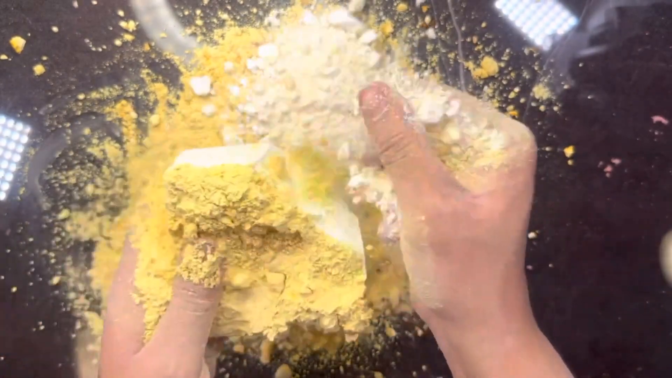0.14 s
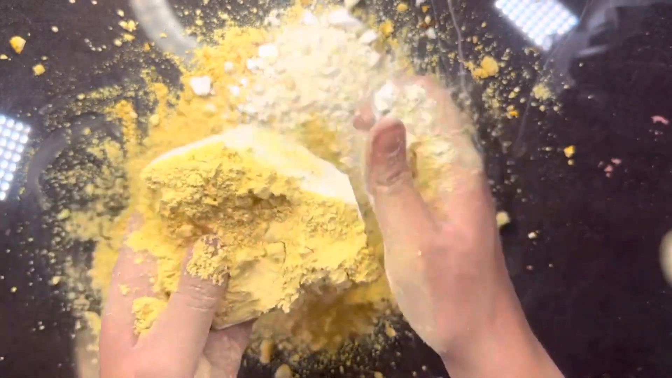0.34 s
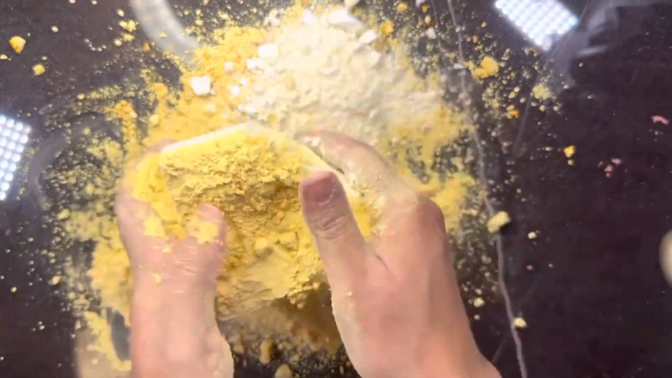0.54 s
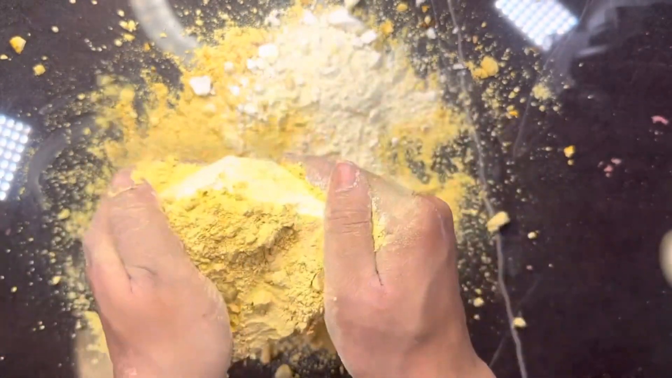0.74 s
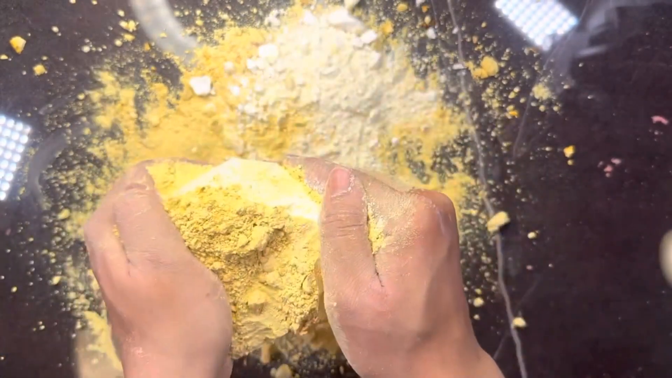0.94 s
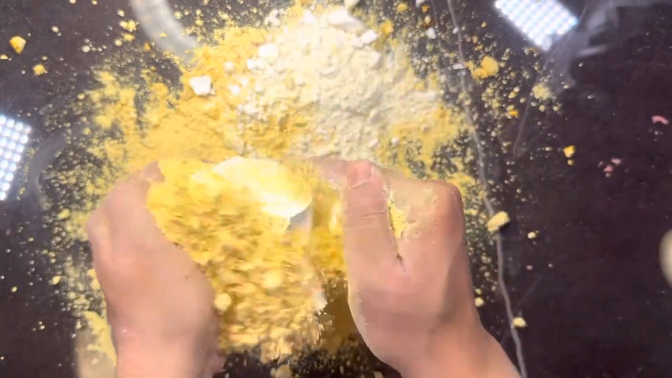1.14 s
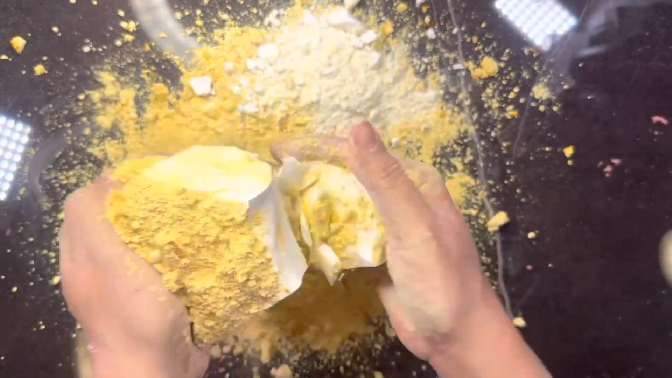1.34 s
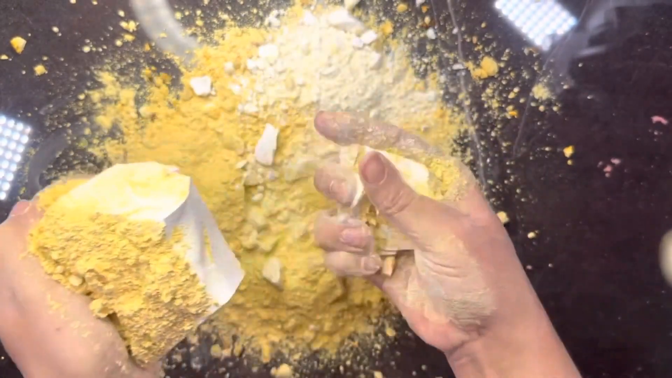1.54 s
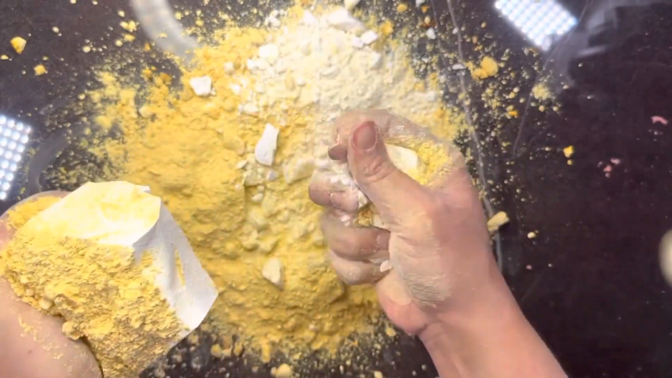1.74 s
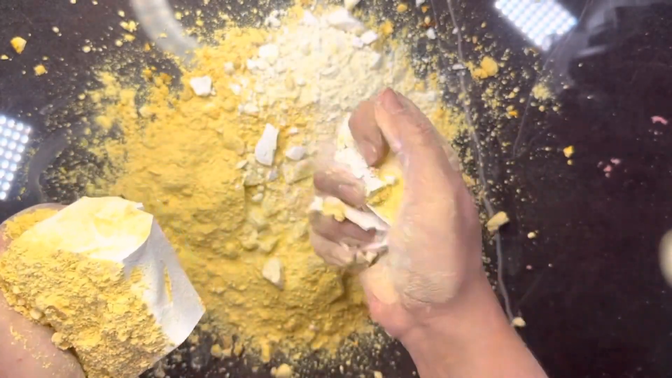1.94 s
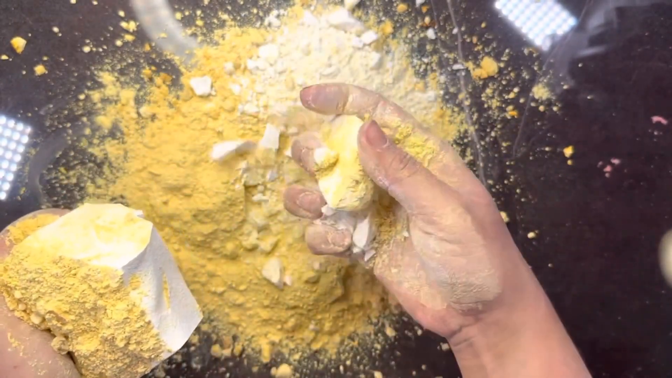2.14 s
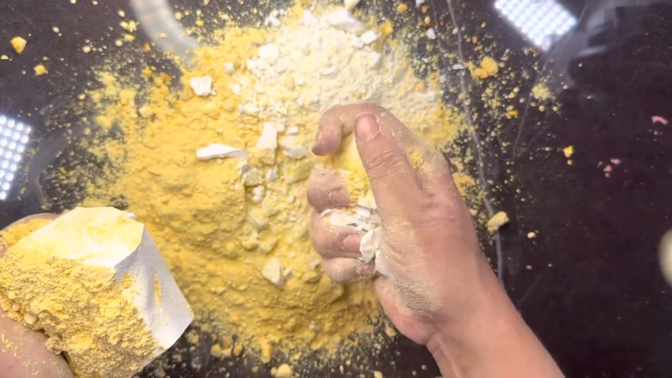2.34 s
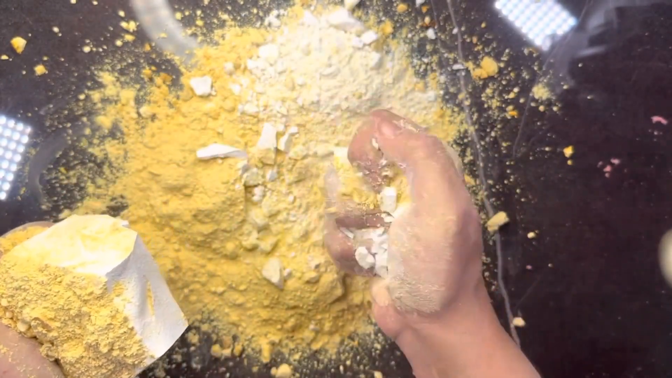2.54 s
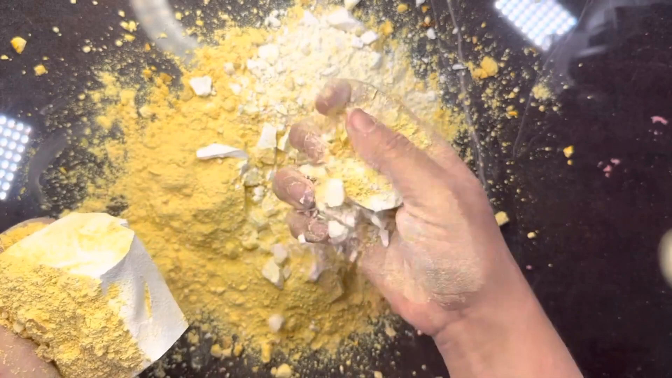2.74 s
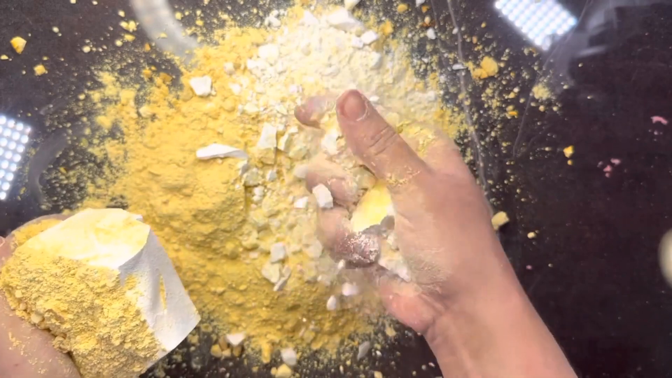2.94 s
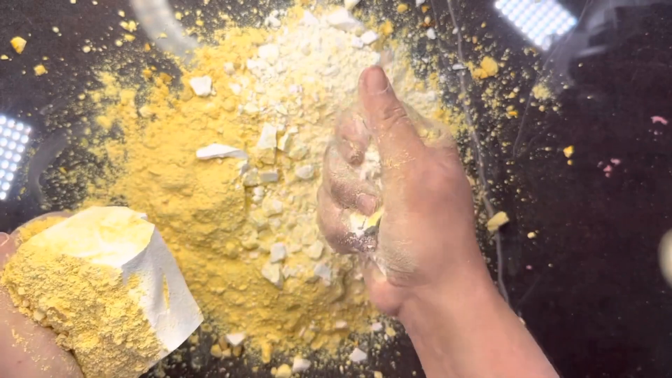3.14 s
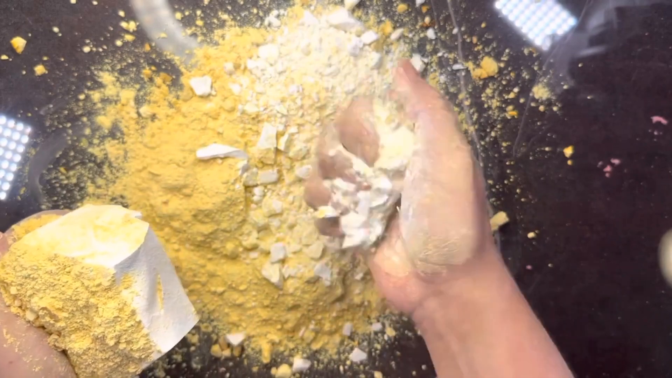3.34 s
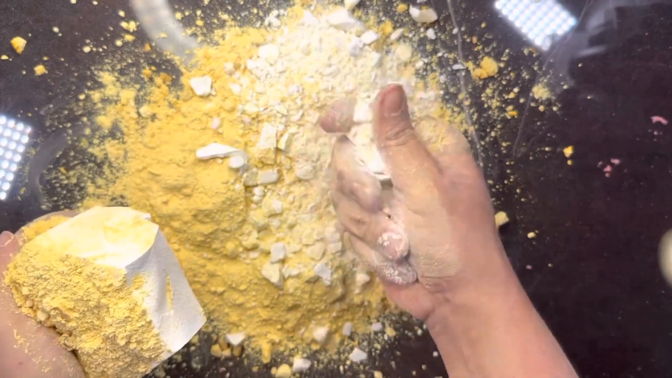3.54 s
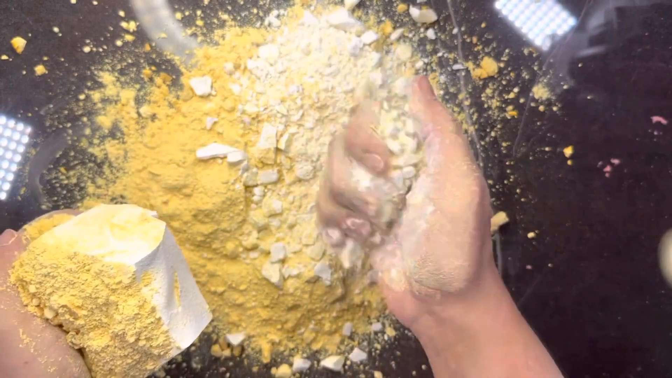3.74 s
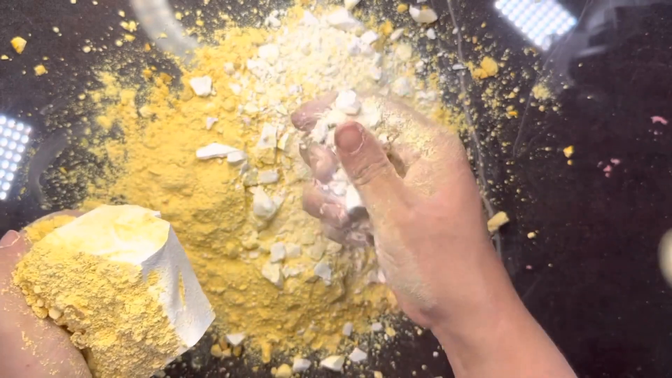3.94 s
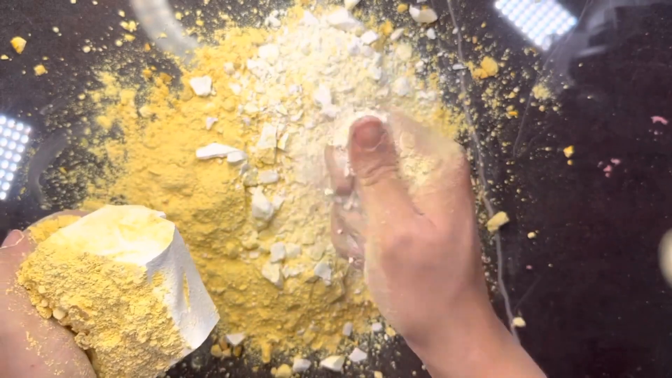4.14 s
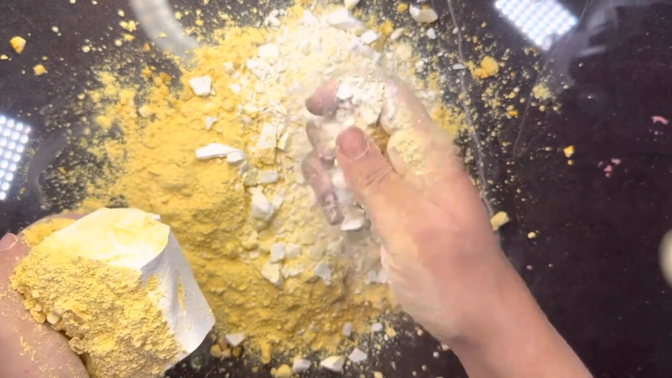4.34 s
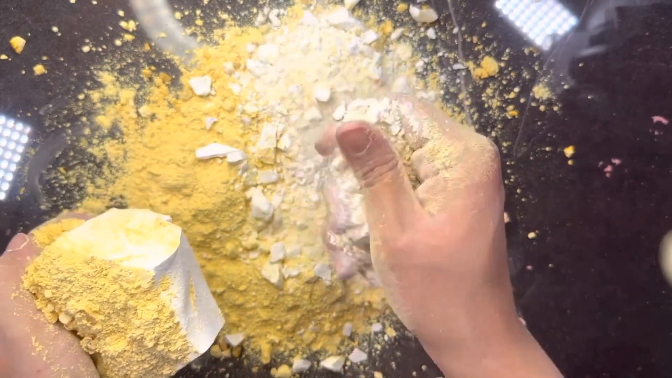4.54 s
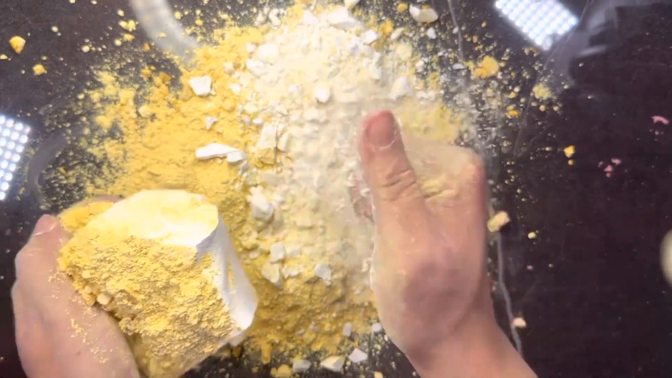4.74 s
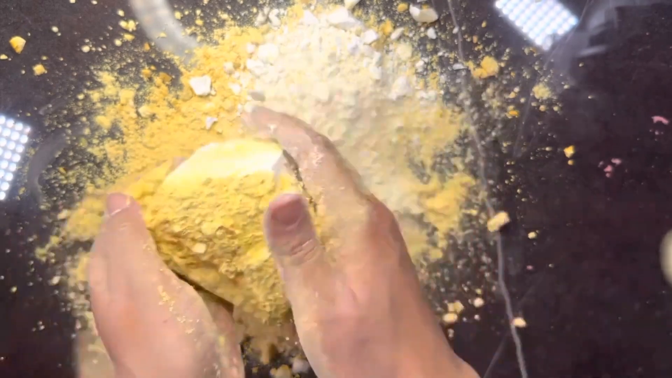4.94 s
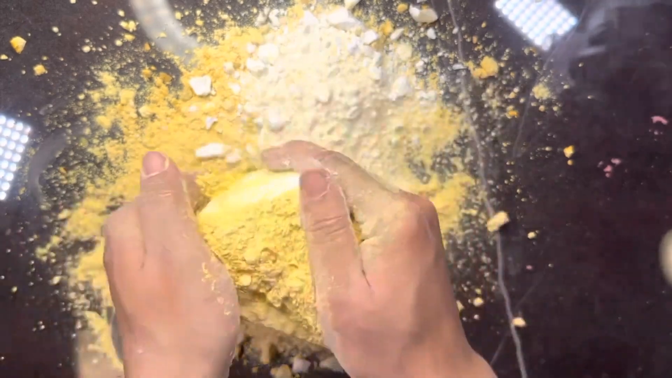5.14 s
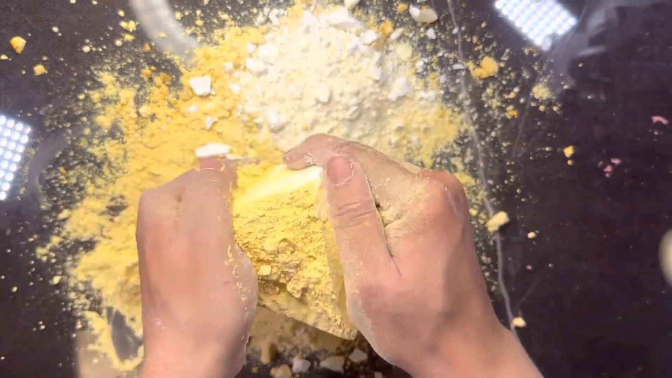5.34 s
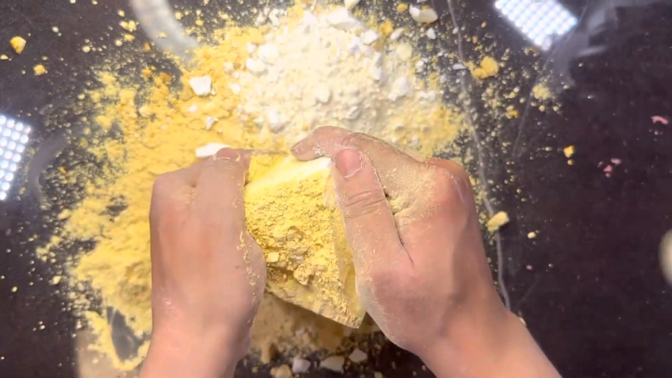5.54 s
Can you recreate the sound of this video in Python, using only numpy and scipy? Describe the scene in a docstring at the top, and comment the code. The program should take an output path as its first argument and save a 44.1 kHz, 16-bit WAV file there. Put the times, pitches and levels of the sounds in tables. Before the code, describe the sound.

Hands handle a block of chalk close to the microphone, in a small room with a faint low rumble. A sharp little crack comes right at the start, followed by soft crunching, a hiss of powder and a brief rasp of skin on chalk. At about 1.1 seconds the block breaks with a brittle snap and a dull thud. From 1.5 to 1.9 seconds a fist crushes the broken piece in a dense run of loud cracks. More squeezes follow around 2.5, 2.9, 3.2, 3.7 and 4 seconds, each with crackling, grinding crumbs, faintly clinking fragments and hissing powder, while lumps knock softly on the table. The crunching grows gentler, with a low bump near 4.9 seconds and a short brush through powder. After a quieter moment, the loudest snap splits the block with a heavy thud at about 5.7 seconds.

```python
"""A brittle snap over a fine crunch: two hands break a block of gym chalk above a table.
Then one fist crushes the broken piece, squeeze after squeeze. Each crack rings its fragment and sheds
debris, freed pieces clink, crumbs grind and powder hisses. The big breaks thud through block, hands and
table, and a last one splits the block again. Heard close up, in a small room with a low rumble."""
import sys
import numpy as np
from scipy import signal
from scipy.fft import rfft, irfft
from scipy.io import wavfile

SR = 44100
rng = np.random.default_rng(int(sys.argv[2]) if len(sys.argv) > 2 else 0)


def wav_out(sig):
    """Save sig, one row per channel (or a flat mono array), as 16-bit PCM at SR to the path in sys.argv[1]."""
    wavfile.write(sys.argv[1], SR, np.round(np.clip(np.atleast_2d(sig).T, -1, 1) * 32767).astype(np.int16))


N = 250929
TIME = np.arange(N) / SR
CUTOFF_HZ = 15550

# the featured cracks: t/s, level/dB, fragment ring f/Hz, brightness f/Hz
CRACKS = [(.1333, -16, 710, 1200), (.1491, -6.5, 7300, 6050), (0.4099, -25.5, 1890, 5300),
          (.544, -18.5, 940, 3200), (.6932, -26.5, 750, 1210), (.813, -29, 1290, 2200),
          (1.0724, -34, 2420, 2200), (1.1245, -7.5, 515, 14100), (1.1284, -6.5, 620, 7000),
          (1.137, -11.5, 507, 1503), (1.483, -13, 4450, 7600), (1.5148, -11, 8000, 7600),
          (1.523, -4.5, 3230, 3540), (1.5529, -13.5, 2610, 8600), (1.5875, -5.5, 2500, 2740),
          (1.6317, -6, 620, 2500), (1.6324, -5, 1760, 1400), (1.6407, -14, 925, 2500),
          (1.6795, -17, 1890, 2800), (1.7196, -19, 1410, 5300), (1.7874, -2, 684, 3295),
          (1.789, -9, 1690, 1300), (1.7952, 2.5, 2320, 6100), (1.797, -6.5, 2860, 2500),
          (1.8095, -10.5, 1690, 1690), (1.8468, -10.5, 720, 4050), (1.8768, -14, 3020, 2800),
          (2.095, -22, 5240, 4700), (2.2, -21.5, 2180, 9700), (2.249, -21, 1412, 16000),
          (2.339, -20, 930, 6700), (2.3859, -16.5, 7400, 6700), (2.4116, -19, 5430, 5300),
          (2.4356, -16, 3260, 3600), (2.4446, -5.5, 6060, 16000), (2.4587, -11.5, 1240, 1180),
          (2.4864, -10, 500, 14000), (2.5203, -9.5, 3574, 3230), (2.5854, -12.5, 1140, 6760),
          (2.7866, -24.5, 1030, 14100), (2.8312, -17, 840, 9800), (2.8877, -10, 2120, 2210),
          (3.0377, -14, 1010, 5930), (3.0633, -15, 1020, 9800), (3.084, -15.5, 930, 16000),
          (3.095, -14.5, 1130, 6000), (3.1273, -12, 1582, 4180), (3.216, -13, 2840, 2830),
          (3.2292, -7.5, 680, 2800), (3.2395, -9, 600, 5340), (3.2446, -13.5, 2410, 3600),
          (3.269, -6.5, 1160, 16300), (3.2835, -10.5, 4186, 3600), (3.5045, -23.5, 1130, 15940),
          (3.6103, -21, 1940, 1697), (3.637, -11.5, 7900, 6700), (3.6515, -13.5, 1130, 16200),
          (3.6752, -11, 2010, 1700), (3.7062, -13.5, 1626, 1507), (3.7451, -19, 2560, 2200),
          (3.931, -16, 1012, 1390), (3.9834, -15, 1710, 12620), (4.0116, -16.5, 1942, 1902),
          (4.0266, -12.5, 740, 3500), (4.1403, -19, 1150, 14100), (4.2305, -17, 4330, 16200),
          (4.2743, -27, 1270, 6010), (4.4802, -17.5, 1240, 1300), (4.5227, -20, 840, 5300),
          (4.616, -19, 500, 2000), (4.9079, -11, 960, 1500), (5.2276, -24.5, 1940, 9800),
          (5.3112, -26.5, 2050, 4000), (5.6801, 1.5, 654, 1100), (5.6815, -0.5, 1900, 1200)]
# bending modes of a piece that springs free: multiple of its ring, level/dB
CLINK_MODES = [(1, -0.5), (1.9, -1.5), (2.9, -7.5)]
# big breaks that jolt block and hand: t/s, level/dB, brightness f/Hz, ring against push level/dB
THUDS = [(1.1216, -2, 298, 37), (1.1283, -10, 350, -8), (1.1386, -6, 370, -7), (1.6308, -5.5, 860, -3),
         (1.7865, -9, 880, 18), (2.4577, -19.5, 1240, 12), (3.2290, -11, 990, 1), (3.2399, -16.5, 700, 8),
         (4.0266, -20.5, 816, -6), (4.616, -20.5, 689, 1), (5.6791, 10, 730, 9)]
# low modes of block, hands and table: f/Hz, level/dB, t60/s
BODY_MODES = [(178.4, 0.5, 0.06), (290, 0.5, 0.078), (404.4, 0.5, 0.051), (473, -32, 0.047),
              (878, -10.5, 0.058), (1440, 0.5, 0.15)]
# fingers squeezing the chalk: peak t/s, build-up/s, release/s, crunch level/dB
SQUEEZES = [(.07, .14, 0.17, -56), (.24, 0.077, 0.16, -59), (.56, 0.18, 0.16, -62.5),
            (.8, 0.13, 0.044, -60), (1.301, 0.024, 0.098, -62.5), (1.645, 0.11, 0.049, -48),
            (1.869, 0.14, 0.038, -51.5), (1.99, 0.066, 0.089, -64.5), (2.251, 0.17, 0.23, -59),
            (2.47, 0.038, 0.048, -51.5), (2.585, .03, 0.082, -53), (2.89, 0.16, 0.05, -53.5),
            (3.095, 0.14, 0.071, -54), (3.246, 0.032, 0.028, -44.5), (3.39, .025, 0.096, -59.5),
            (3.53, 0.079, 0.12, -55), (3.695, 0.104, 0.046, -48.5), (3.87, .06, 0.12, -59.5),
            (3.945, 0.023, 0.026, -51), (4.04, .04, 0.053, -52.5), (4.209, 0.11, 0.026, -55),
            (4.42, 0.18, 0.11, -61), (4.62, 0.15, 0.11, -58), (4.765, .1, 0.077, -54),
            (4.925, 0.034, 0.085, -55)]
# a palm brushing through loose powder: peak t/s, build-up/s, release/s, hiss level/dB
BRUSHES = [(.24, 0.08, .08, -57), (.535, 0.091, 0.068, -55), (.64, 0.026, 0.064, -58.5),
           (1.42, .12, 0.044, -56), (1.5, 0.028, 0.071, -54), (2.38, .08, .04, -57),
           (2.76, 0.07, 0.22, -53.5), (3.1, 0.11, .09, -52.5), (3.85, .04, 0.03, -57.5),
           (4.44, .1, 0.056, -63.5), (4.8, .15, .15, -61.5), (5.05, 0.048, 0.15, -54)]
# tone of the crunching crumbs: f/Hz, level/dB
CRUMB_COLOUR = [(150, -9.5), (350, 1.5), (600, -5), (1000, -0.5), (1700, -4.5), (3000, -5), (4500, -9.5),
                (8000, -36), (16000, -16)]
# tone of the hissing powder: f/Hz, level/dB
POWDER_COLOUR = [(1000, -20), (2500, -2), (4200, -1.5), (6000, 4.5), (8500, -2.5), (11000, -4.5),
                 (14000, -7), (16000, 0)]
# short dull knocks (lumps landing, hand bumps, the after-ring of the first break and the clack of
# the last): t/s, level/dB, f/Hz
KNOCKS = [(.516, -32, 1040), (.545, -24, 1030), (1.153, -25, 1440), (1.157, -26, 650), (1.166, -28, 1480),
          (1.296, -30, 1674), (1.372, -31.5, 875), (2.143, -27, 990), (2.166, -31, 960), (2.398, -25, 1460),
          (2.459, -22, 1420), (2.581, -21.5, 840), (2.834, -27, 836), (3.066, -28, 1410), (3.231, -15, 815),
          (3.383, -28, 1150), (4.195, -27.5, 890), (4.545, -24.5, 982), (4.755, -15, 71.6),
          (4.909, -26, 900), (4.912, -10.5, 151), (4.94, -26, 925), (5.311, -33.5, 2030),
          (5.465, -41, 1330), (5.510, -39, 900), (5.6795, 1.5, 890)]
# fingers sliding over the block's smooth face: middle t/s, half length/s, level/dB
SLIDES = [(0.534, 0.02, -49.5), (0.64, 0.023, -51), (1.42, .03, -64), (1.507, 0.024, -51),
          (5.036, 0.044, -59)]
# resonances of dry skin rasping on chalk: f/Hz, width/Hz, level/dB
RASP_BANDS = [(4470, 180, 1), (6460, 390, 0), (8560, 720, -2.5), (10100, 880, -6), (13000, 1400, -7)]
# air pockets between hands and table: f/Hz, width/Hz, boost or dip level/dB
HOLLOWS = [(562, 53, 0.5), (875, 110, 2.5), (1282, 150, -4), (1494, 150, 3), (1696, 90, 3), (2430, 43, 3.5),
           (3560, 1000, 1.5), (5920, 490, -0.5), (8970, 1200, 3.5)]
# decay of the room: f/Hz, t60/s
ROOM_DECAY = [(200, 0.38), (1500, 0.2), (5000, 0.3), (14000, 0.1)]
# reflections against the direct sound: f/Hz, level/dB
ROOM_COLOUR = [(200, -18), (1500, -9.5), (5000, -13.5), (14000, -11.5)]
# spectrum of the room tone: f/Hz, level/dB
RUMBLE_COLOUR = [(12, -3.5), (24, 3.5), (33, -3.5), (50, -13), (72, -7.5), (100, -15), (128, -10),
                 (145, -17.5), (170, -14.5), (220, -27), (400, -37), (1000, -44.5), (4000, -54.5),
                 (16000, -53)]


def crack(ring_hz, bright_hz, tear_cycles=.59, splinter_db=-5, splinter_s=.0028, size=1024):
    """A fracture tears through, the quicker the brighter; it and its splinters ring the damped fragment."""
    force = scatter(tear_cycles / bright_hz, size) + from_db(splinter_db) * scatter(splinter_s, size)
    force[0] += rng.choice([-1, 1])
    q = 1.2 * (ring_hz / 1500) ** .11   # small chips ring more clearly than lumps held in the hand
    w = 2 * np.pi * min(ring_hz, SR / 3) / SR
    damping = np.sin(w) / (2 * q)
    # resonant high-pass: the fragment radiates little below its ring
    rung = signal.lfilter([1, -2, 1], [1 + damping, -2 * np.cos(w), 1 - damping], force)
    softened = butter(rung, bright_hz, "low", order=1)
    return energy_one(butter(softened, 15000, "low"))


def cracks(trim_db=-.5):
    """The foreground fractures, each with the pitch of its own fragment."""
    out = np.zeros(N)
    for s, db, ring_hz, bright_hz in CRACKS:
        add(out, s, from_db(db + trim_db) * crack(ring_hz, bright_hz))
    return out


def clinks(trim_db=-9, t60_cycles=55, free_hz=1900, size=4096):
    """Pieces that spring free ring briefly in their bending modes."""
    t, out = TIME[:size], np.zeros(N)
    for s, db, ring_hz, _ in CRACKS:
        freedom = 1 / (1 + (free_hz / ring_hz) ** 4)   # lower-pitched pieces stay damped in the hand
        modes = sum(from_db(mode_db) * np.sin(2 * np.pi * ratio * ring_hz * t)
                    for ratio, mode_db in CLINK_MODES if ratio * ring_hz < CUTOFF_HZ)
        decay = from_db(-60 * t * ring_hz / t60_cycles)
        add(out, s, freedom * from_db(db + trim_db) * energy_one(modes * decay))
    return out


def thuds(low_cut_hz=170, size=8192):
    """Released strain kicks the block: a blunt push, then the low modes of block, hands and table."""
    t, out = TIME[:size], np.zeros(N)
    modes = sum(from_db(db - 60 * t / t60) * np.cos(2 * np.pi * hz * t) for hz, db, t60 in BODY_MODES)
    kick = butter(signal.unit_impulse(size), low_cut_hz, "high")
    for s, db, bright_hz, ring_db in THUDS:
        push = energy_one(butter(kick, bright_hz, "low"))
        ring = energy_one(butter(modes, bright_hz, "low", order=1))
        add(out, s, from_db(db) * energy_one(push + from_db(ring_db) * ring))
    return out


def chips(effort_db, usual_per_s=26, usual_db=-28, ring_hz=1310, bright_hz=4520, spread_octaves=.7):
    """Small chips snap off at random, more and louder the harder the hand works."""
    out = np.zeros(N)
    vigour = from_db(.9 * np.minimum(effort_db, 10))
    onsets = np.flatnonzero(rng.random(N) < usual_per_s * vigour / SR)
    variations = rng.standard_normal((len(onsets), 3)).clip(-2, 2)
    for i, (accent_db, pitch, edge) in zip(onsets, variations):
        snap = crack(ring_hz * 2 ** (spread_octaves * pitch), bright_hz * 2 ** (spread_octaves * edge))
        add(out, i / SR, vigour[i] * from_db(usual_db + accent_db) * snap)
    return out


def swell(peak_s, build_s, release_s, db, swing_db=9.5, roundness=1.4):
    """Power of one hand move: it gains swing_db over the build-up and loses it over the release."""
    away = np.maximum((peak_s - TIME) / build_s, (TIME - peak_s) / release_s)
    return from_db(db - swing_db * np.minimum(away, 10) ** roundness) ** 2


def debris(trim_db, settle_s, tiny_hz=np.inf):
    """Power of the shower trickling from each crack; fragments ringing above tiny_hz shed little."""
    shed = np.zeros(N)
    for s, db, ring_hz, _ in CRACKS:
        add(shed, s, [from_db(db + trim_db) ** 2 / (1 + (ring_hz / tiny_hz) ** 2)])
    return signal.lfilter([1], [1, -np.exp(-2 / (settle_s * SR))], shed + 1e-18)


def handling(hold_db=-77, brush_crunch_db=-10, squeeze_hiss_db=-.5):
    """Holding, squeezing, brushing and debris add up to two envelopes in dB: crunch and hiss."""
    squeezing = sum(swell(*row) for row in SQUEEZES) + from_db(hold_db) ** 2
    brushing = sum(swell(*row) for row in BRUSHES)
    falling_crumbs = debris(trim_db=-43.5, settle_s=.025, tiny_hz=2884)
    falling_powder = debris(trim_db=-54, settle_s=.02)
    crunch = squeezing + brushing * from_db(brush_crunch_db) ** 2 + falling_crumbs
    hiss = brushing + squeezing * from_db(squeeze_hiss_db) ** 2 + falling_powder
    return 10 * np.log10(crunch), 10 * np.log10(hiss)


def grinding(colour, per_s, spread_db, rub_db, slip_db, patchy_db=0):
    """Tiny fractures, each with its own tint, over smooth rubbing; both surge as chalk sticks and slips."""
    clicks, out = grains(per_s, spread_db), np.zeros(N)
    rub = rng.standard_normal((2, N))
    for k, (edges, hz) in enumerate(bands()):
        tinted = rms_one(clicks * rng.standard_normal(N))
        band = butter(tinted + from_db(rub_db) * rub[k % 2], edges, "band")
        out += band * from_db(at_hz(colour, hz) + patchy_db * drift(per_s=25))
    return rms_one(out * from_db(slip_db * drift(per_s=70)))


def knocks(decay_cycles=6, q=3.2, size=8192):
    """Short dull knocks: a burst a few cycles long drives a damped resonance, so low ones last longer."""
    out = np.zeros(N)
    for s, db, hz in KNOCKS:
        force = scatter(decay_cycles / hz, size) + signal.unit_impulse(size)
        rung = butter(resonance(force, hz, hz / q), [hz / 2, 2 * hz], "band")
        add(out, s, from_db(db) * energy_one(rung))
    return out


def slides():
    """Skin sticks and slips on the chalk, thousands of times a second, in a thin high rasp."""
    slips = grains(per_s=9400, spread_db=-2)
    rasp = sum((-1) ** k * from_db(db) * resonance(slips, hz, width)
               for k, (hz, width, db) in enumerate(RASP_BANDS))
    strokes = sum(from_db(db) * np.exp(-((TIME - s) / half_s) ** 2) for s, half_s, db in SLIDES)
    return strokes * rms_one(rasp)


def hollows(x, trim_db=-1.5):
    """Air between the cupped hands and the table lifts some bands and dips others."""
    colouring = sum((from_db(db) - 1) * resonance(x, hz, width) for hz, width, db in HOLLOWS)
    return from_db(trim_db) * (x + colouring)


def room(x, attack_s=.0006, size=16384):
    """Dense reflections from table and walls, the very top dying first."""
    t, response = TIME[:size], np.zeros(size)
    noise = rng.standard_normal((2, size))
    attack = 1 - np.exp(-t / attack_s)
    for k, (edges, hz) in enumerate(bands()):
        tail = energy_one(attack * from_db(-60 * t / at_hz(ROOM_DECAY, hz)))
        response += from_db(at_hz(ROOM_COLOUR, hz)) * butter(noise[k % 2], edges, "band") * tail
    return signal.fftconvolve(x, response)[:N]


def rumble(level_db=-49):
    """Room tone: a steady low bed with a faint hiss on top."""
    hz = np.arange(N // 2 + 1) * SR / N
    spectrum = rfft(rng.standard_normal(N)) * from_db(at_hz(RUMBLE_COLOUR, hz))
    return from_db(level_db) * rms_one(irfft(spectrum, N))


def scatter(decay_s, size):
    """A short uneven burst that swells and dies; energy 1."""
    fade = np.exp(-TIME[:size] / decay_s)
    burst = rng.standard_normal(size) * np.sqrt(rng.exponential(1, size))
    return energy_one(burst * fade * (1 - fade))


def grains(per_s, spread_db):
    """Random clicks of uneven size; rms 1 however dense they come."""
    onsets = rng.random(N) < per_s / SR
    sizes = from_db(spread_db * np.minimum(rng.exponential(1, N), 3.9))
    return rms_one(onsets * sizes * rng.choice([-1, 1], N) / np.sqrt(per_s))


def drift(per_s):
    """A random wobble of rms 1 that glides to per_s new values a second."""
    knots = rng.standard_normal(4096)
    return rms_one(np.interp(TIME * per_s, np.arange(len(knots)), knots))


def bands():
    """Fourteen half-octave bands: (edges, centre) in Hz."""
    edges = np.geomspace(125, 17000, 15)
    return [([low, high], np.sqrt(low * high)) for low, high in zip(edges, edges[1:])]


def resonance(x, hz, width_hz):
    """Two-pole resonance with a peak gain of 1."""
    r = np.exp(-np.pi * width_hz / SR)
    w = 2 * np.pi * hz / SR
    return signal.lfilter(np.array([1, 0, -1]) * (1 - r * r) / 2, [1, -2 * r * np.cos(w), r * r], x + 1e-18)


def butter(x, hz, kind, order=2):
    """Causal Butterworth filter."""
    sections = signal.butter(order, np.clip(hz, 10, .45 * SR), kind, fs=SR, output="sos")
    return signal.sosfilt(sections, x + 1e-18)


def at_hz(points, hz):
    """Read a table on a log-frequency axis."""
    freqs, values = np.transpose(points)
    return np.interp(np.log(np.maximum(hz, 1)), np.log(freqs), values)


def add(track, s, sound):
    """Mix a short sound into a track at s seconds."""
    start = int(np.clip(round(s * SR), 0, N - 1))
    track[start:start + len(sound)] += sound[:N - start]


def from_db(db):
    """Decibels to gain."""
    return 10 ** (np.asarray(db) / 20)


def rms_one(x):
    """Scale to an rms of 1."""
    return x / np.sqrt(np.mean(x ** 2) + 1e-20)


def energy_one(x):
    """Scale to an energy of 1."""
    return x / np.sqrt(np.sum(x ** 2) + 1e-20)


def scene(usual_crunch_db=-57):
    """The mix: breaking chalk up front, reflections and rumble behind; both channels alike."""
    crunch_db, hiss_db = handling()
    effort_db = crunch_db - usual_crunch_db
    density = from_db(.9 * effort_db)   # a harder squeeze breaks more grains a second
    crumbs = from_db(crunch_db) * grinding(
        CRUMB_COLOUR, per_s=700 * density, spread_db=3.5, rub_db=-2, slip_db=2.5)
    powder = from_db(hiss_db) * grinding(
        POWDER_COLOUR, per_s=1100 * density, spread_db=8.5, rub_db=4.5, slip_db=3, patchy_db=-.84)
    bed = rumble()
    accents = thuds() + knocks() + slides()
    chalk = hollows(cracks() + clinks() + crumbs + powder + chips(effort_db)) + accents
    mono = chalk + room(chalk) + bed
    return np.array([mono, mono])


def record(dry):
    """A steep low-pass takes off the very top."""
    return signal.sosfilt(signal.ellip(10, .1, 80, CUTOFF_HZ, fs=SR, output="sos"), dry)


dry = scene()
out = record(dry)
wav_out(out)
```